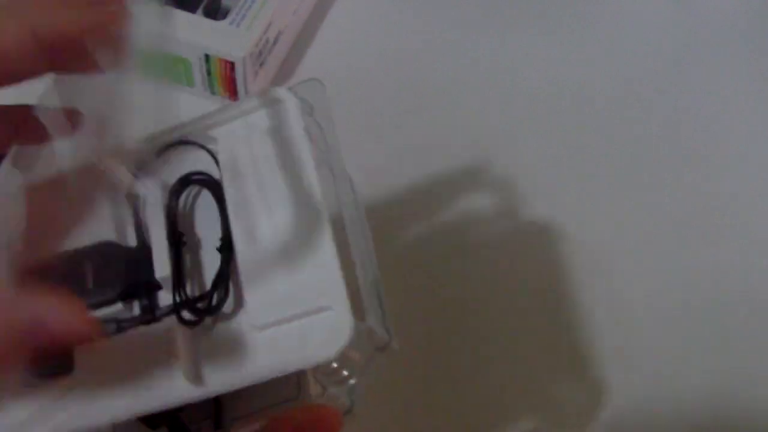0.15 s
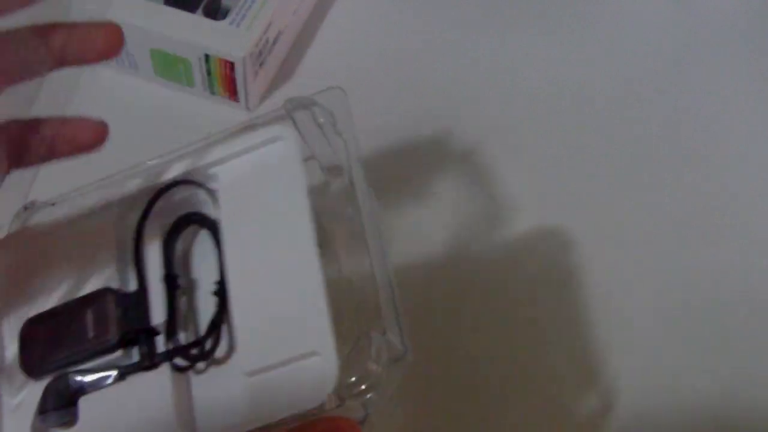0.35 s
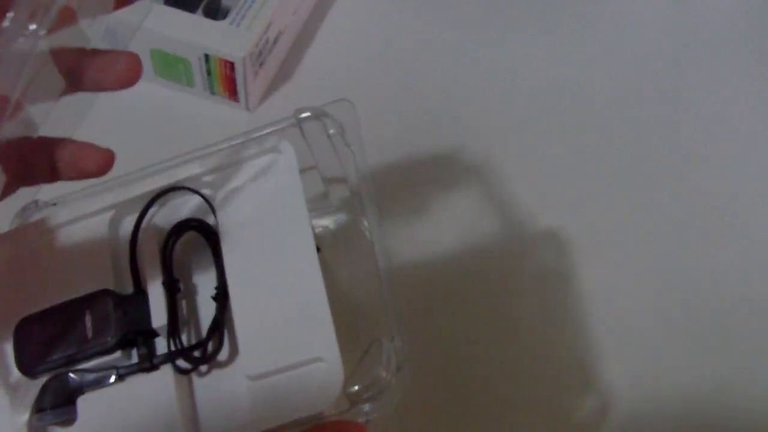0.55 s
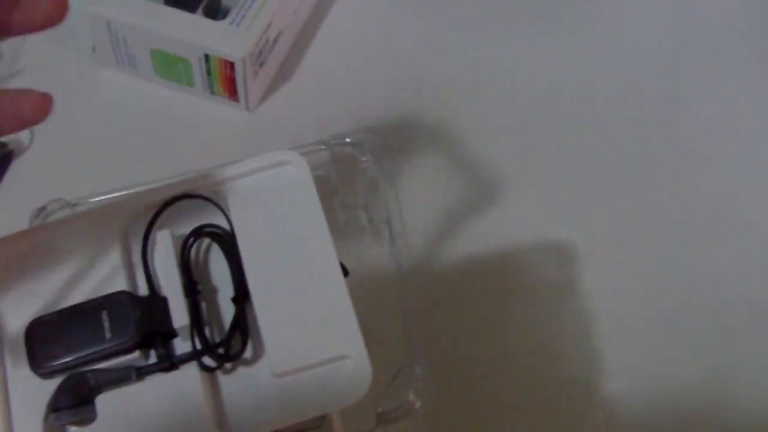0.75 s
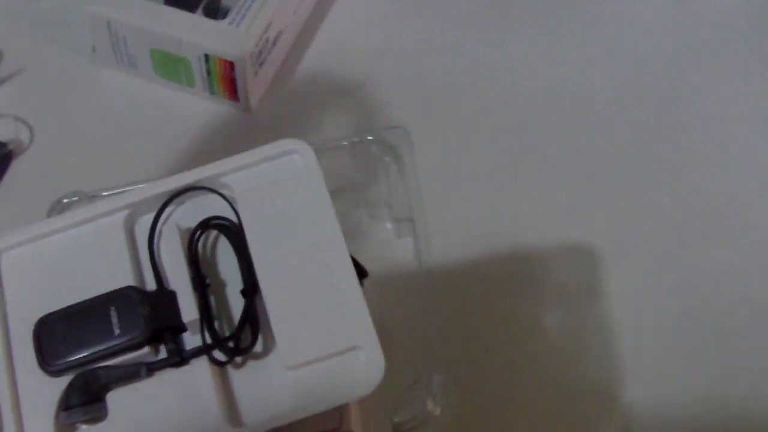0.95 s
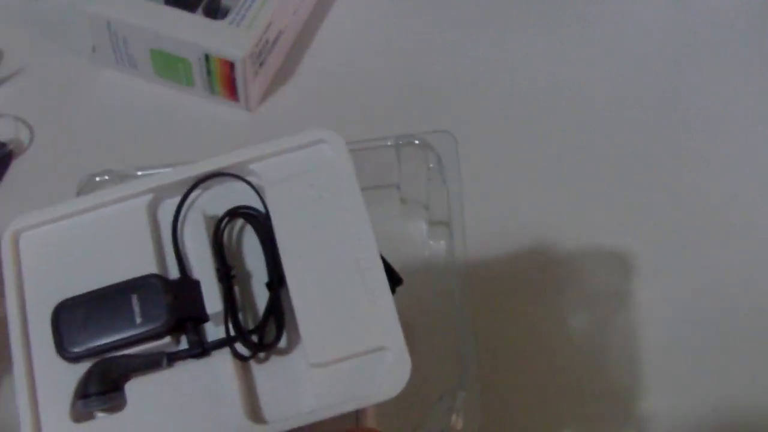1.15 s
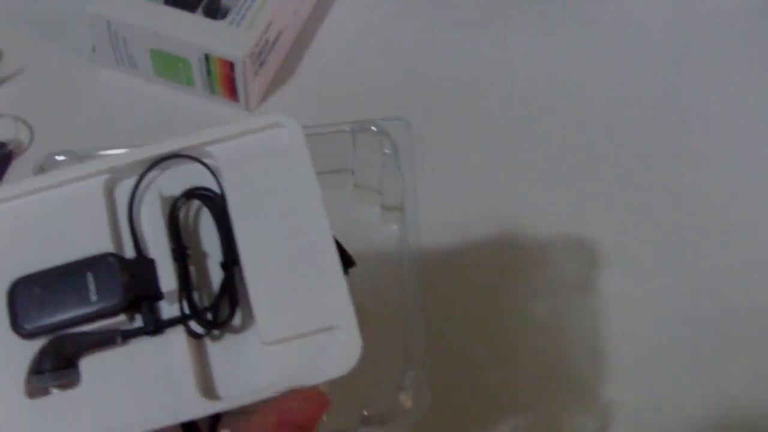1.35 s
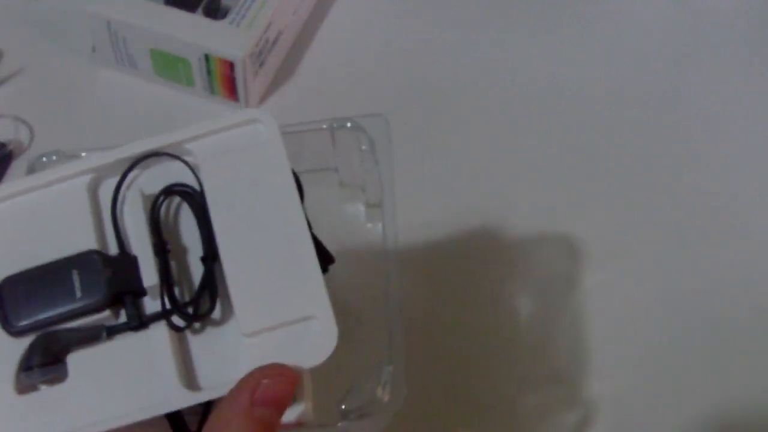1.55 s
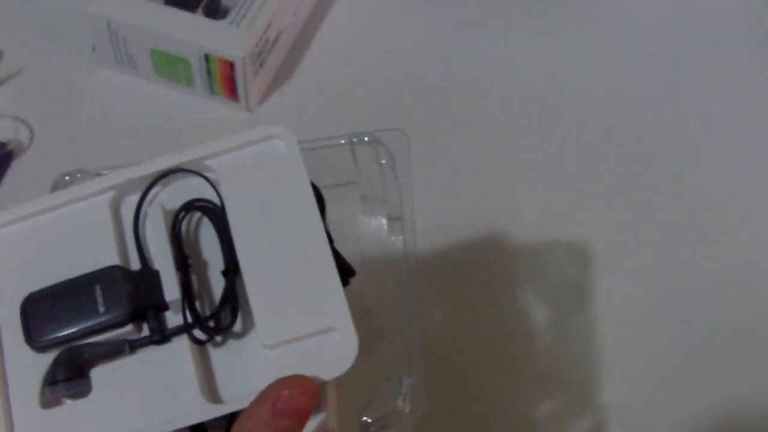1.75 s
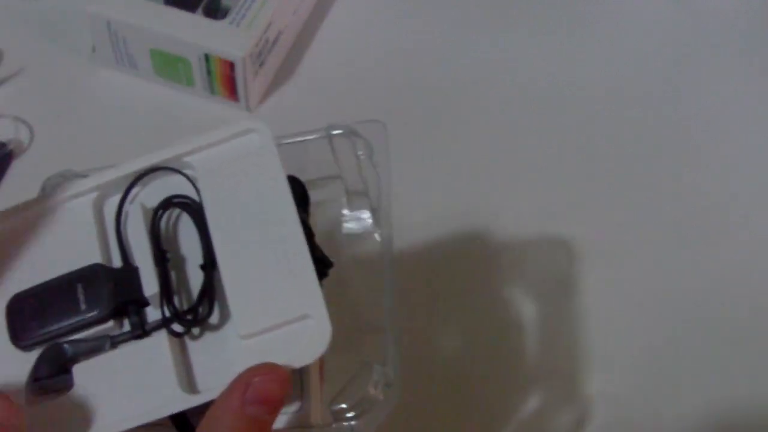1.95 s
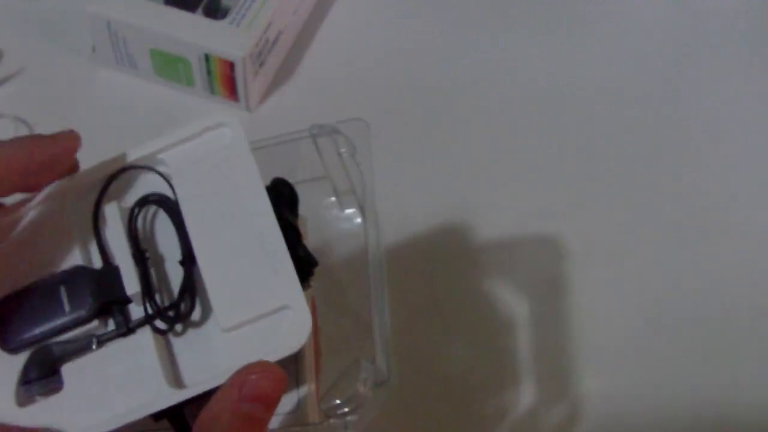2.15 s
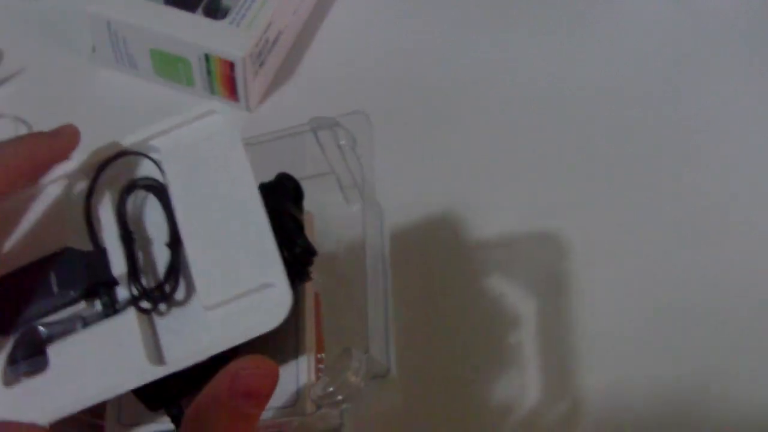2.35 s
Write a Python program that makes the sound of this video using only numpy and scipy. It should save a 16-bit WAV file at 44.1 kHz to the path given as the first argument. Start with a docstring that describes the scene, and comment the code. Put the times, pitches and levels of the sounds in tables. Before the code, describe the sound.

Stiff thin plastic buckles in short dry clicks, its catch bursts open with a sharp clatter, the tray slides out quietly with light creaks and ticks, then more crackles; close, slightly thin sound, small room, faint steady hiss.

```python
"""The walls of a clear plastic clamshell pack buckle in short clicks as it is pried open in a small room,
and its catch lets go with a loud rattling snap: each is a brief slip that excites damped modes.
The inner tray slides out with a hiss of dense friction grains and a faint squeak, the shell creaks
in the hands as small slips ring in a moving hollow, and coarser grains scuff its walls.
Feedback delays give the echo of the room, and filtered noise gives its steady tone."""
import sys
import numpy as np
from scipy import signal
from scipy.fft import rfft, irfft
from scipy.io import wavfile

SR = 44100
rng = np.random.default_rng(int(sys.argv[2]) if len(sys.argv) > 2 else 0)


def unload_audio(sound):
    """Save the sound as a 16-bit wav file, at the path given as the first command line argument."""
    columns = np.transpose(np.atleast_2d(sound))
    # keep every value between -1 and 1, then stretch to whole-number steps
    steps = np.round(np.clip(columns, -1, 1) * 32767)
    wavfile.write(sys.argv[1], SR, steps.astype(np.int16))


def natural_amplitude(level_db):
    """Convert a level in decibels to a linear amplitude factor, elementwise."""
    exponent = np.asarray(level_db, float) / 20
    return 10 ** exponent


N = 105840

# Spectrum of the room tone: frequency_hz, relative_level_db
ROOM_TONE_SPECTRUM = [(30, -22), (161, -25.5), (392, -3.5), (1180, -3), (1610, -3.5), (1990, -7.5),
                      (15800, -25.5)]
# Modes of the plastic shell: frequency_hz, relative_level_db, t60_s
SHELL_MODES = [(922, -13.5, 0.04), (1188, 5.5, 0.0075), (1707, 1.5, 0.0051), (2248, -2, 0.008),
               (2700, 4, 0.0051), (3213, 4, 0.003), (4130, -10.5, 0.0042), (5120, -9.5, 0.008)]
# Fingers and edges scuff the shell: start_s, rise_s, hold_s, fall_s, level_db, treble_to_body_db
SCUFFS = [(0.062, 0.0022, 0.023, 0.055, -46, -26), (0.121, 0.004, 0.03, 0.028, -46, -27),
          (0.194, 0.0018, 0.011, 0.027, -39.5, -32), (0.226, 0.0035, 0.01, 0.009, -39, -28),
          (0.262, 0.0039, 0.013, 0.16, -37.5, -7), (0.458, 0.019, 0.027, 0.0026, -56.5, -45),
          (0.549, 0.016, 0.033, 0.026, -48, -10), (.615, 0.005, 0.018, 0.017, -51, -32),
          (1.373, 0.0075, 0.022, 0.24, -64.5, 10.5), (2.037, 0.0072, 0.011, 0.015, -55, -22),
          (2.084, 0.035, 0.028, 0.038, -48.5, -4), (2.17, 0.017, 0.018, 0.02, -45, 0),
          (2.283, 0.0038, 0.036, 0.061, -46, -18), (2.334, 0.015, 0.038, 0.019, -54, 5.5)]
# Course of the creaking under the fingers: time_s, level_db
CREAK_LEVEL = [(0, -64), (.62, -64), (.8, -72), (.84, -61.5), (1.05, -59), (1.15, -58.5), (1.3, -64),
               (1.335, -58.5), (1.4, -52), (1.47, -53), (1.52, -48.5), (1.6, -57.5), (1.7, -56),
               (1.78, -63), (1.9, -63), (2.0, -62.5)]
# Spectrum of the creaking body at large: frequency_hz, relative_level_db
CREAK_BODY_SPECTRUM = [(60, -47), (100, -26), (270, -9), (480, -0.5), (920, -1), (1380, -3), (3000, -6.5),
                       (12000, -34.5)]
# Hollow under the grip: time_s, centre_hz, level_to_body_db
GRIP_HOLLOW = [(.62, 950, -6), (.84, 1300, -5), (.95, 700, -8), (1.3, 560, -8), (1.55, 650, -8),
               (1.63, 1220, 1), (1.72, 1290, 2), (2.04, 1200, 1)]
# Strokes of the tray sliding out: start_s, rise_s, hold_s, fall_s, level_db
SLIDES = [(.835, .13, .18, .03, -59), (1.387, .003, .025, .2, -53), (1.508, .004, .02, .28, -60),
          (1.66, .12, .13, .09, -63)]
# Spectrum of the sliding hiss: frequency_hz, relative_level_db
HISS_SPECTRUM = [(1500, -15.5), (3000, -3), (4600, -2.5), (5700, -7), (6700, 0.5), (7500, -2.5),
                 (8300, -7.5), (10200, -4.5), (13300, -16.5), (15500, -28)]
# Buckling clicks: start_s, body_peak_db, pitch_hz, relative_treble_db, slip_decay_s
CLICKS = [(.027, -29, 940, -8.5, 0.002), (.058, -29.5, 1130, -13.5, 0.0011), (.086, -24, 1024, -27, 0.003),
          (.126, -26.5, 1310, -15, 0.0035), (.142, -28, 1050, -15, 0.0011), (.182, -38, 1480, -1, 0.002),
          (.195, -22.5, 1270, -1.5, 0.0034), (.225, -23, 2300, -8, .0015), (.378, -36, 1390, -27, 0.0023),
          (.385, -40, 5200, -28, 0.0011), (.461, -39, 1160, -47, 0.0038),
          (.498, -39.5, 2700, -15.5, 0.00064), (.682, -45.5, 946, -27.5, .006),
          (.953, -39, 1080, -13.5, 0.0017), (1.074, -47, 490, -28, 0.00082),
          (1.138, -42.5, 2700, -22, 0.0037), (1.332, -40, 533, -2, 0.0027),
          (1.369, -34.5, 2920, -14.5, 0.0014), (1.388, -34.5, 600, 6.5, 0.0022),
          (1.392, -36, 3850, 2.5, 0.0068), (1.482, -22, 1740, -24, 0.00023),
          (1.5085, -29, 600, -11, 0.0037), (2.005, -41, 5000, -17, 0.0027),
          (2.016, -35, 1170, -20.5, 0.0042), (2.066, -38, 890, -43.5, 0.0026),
          (2.089, -41, 1220, -44, 0.0012), (2.107, -31, 1160, -29.5, 0.0027),
          (2.141, -30.5, 1280, -26.5, 0.0019), (2.187, -31.5, 1040, -6, 0.0097),
          (2.246, -25, 1360, -32, 0.004), (2.256, -27.5, 1130, -14.5, 0.0026),
          (2.271, -29, 4790, -25.5, 0.0018), (2.274, -26.5, 2800, -10, 0.0033),
          (2.287, -26, 974, -23, 0.005), (2.33, -34, 1060, -38, 0.003)]
# The catch lets go and rattles out: start_s, body_peak_db, relative_treble_db, slip_decay_s
SNAP = [(.2475, -5, -7.5, 0.004), (.2505, -7, -8, 0.0032), (0.2533, -3.5, -13, 0.0047),
        (.257, -15.5, -14.5, 0.0066), (.269, -12, -21, 0.0025), (.287, -25.5, -11, 0.0051),
        (.304, -26.5, -4, 0.0044), (.32, -33.5, -21, 0.0036), (.343, -30.5, -9, 0.0026),
        (.351, -32, -14.5, 0.0018)]


def rms_one(x):
    """Normalisation: divides a signal by its root mean square."""
    return x / np.sqrt(np.mean(x ** 2) + 1e-20)


def in_time(rows):
    """Linear interpolation: draws the columns of a timed table out to every sample."""
    times_s, *columns = np.transpose(rows)
    return [np.interp(np.arange(N) / SR, times_s, column) for column in columns]


def coloured(white, spectrum):
    """Spectral shaping: weights a white signal by a curve over log frequency, to rms 1."""
    hz, db = np.transpose(spectrum)
    bins_hz = np.maximum(np.fft.rfftfreq(N, 1 / SR), 1)
    gain = natural_amplitude(np.interp(np.log(bins_hz), np.log(hz), db))
    return rms_one(irfft(rfft(white) * gain, N))


def grains(per_s, spread_db):
    """Stick-slip as a random point process: sparse impulses of uneven size and sign."""
    sizes = natural_amplitude(spread_db * np.minimum(rng.exponential(1, N), 5)) * rng.choice([-1, 1], N)
    return sizes * (rng.random(N) < per_s / SR)


def stroke(start_s, rise_s, hold_s, fall_s, level_db):
    """Envelope linear in decibels: a stroke swells, holds, fades and dies away."""
    fade_db = 30.5
    times_s = np.cumsum([start_s, rise_s, hold_s, fall_s, 2 * fall_s])
    levels_db = level_db - fade_db * np.array([1, 0, 0, 1, 3])
    gain = np.zeros(N)
    i = np.arange(int(start_s * SR), min(int(times_s[-1] * SR), N))
    gain[i] = natural_amplitude(np.interp(i / SR, times_s, levels_db))
    return gain


def filtered(x, order, hz, kind):
    """Linear filtering: a Butterworth high-pass or low-pass."""
    return signal.sosfilt(signal.butter(order, hz, kind, fs=SR, output="sos"), x)


def ring(force, hz, t60_s):
    """Damped resonance: a unit impulse sets a decaying sine of height 1 ringing."""
    radius = natural_amplitude(-60 / (t60_s * SR))
    angle = 2 * np.pi * hz / SR
    poles = [1, -2 * radius * np.cos(angle), radius * radius]
    return signal.lfilter([0, np.sin(angle)], poles, force + 1e-18)


def shell(force, strengths_db, treble_db):
    """Modal superposition: one force drives every mode, and a soft contact leaves high ones weak."""
    dull_from_hz, usual_treble_db = 2000, -13
    out = 0
    for (hz, mode_db, t60_s), strength_db in zip(SHELL_MODES, strengths_db):
        contact_db = min(treble_db - usual_treble_db, 3.0) if hz > dull_from_hz else 0
        out = out + natural_amplitude(mode_db + strength_db + contact_db) * ring(force, hz, t60_s)
    return out


def bright(slip):
    """Direct radiation: a slip sounds in a band of treble without the help of the modes."""
    return filtered(filtered(slip, 2, 1980, "high"), 2, 5000, "low")


def room_tone():
    """Stationary noise: a steady spectrum shaped from white noise."""
    level_db = -64.5
    return natural_amplitude(level_db) * coloured(rng.standard_normal(N), ROOM_TONE_SPECTRUM)


def room(x):
    """Reverberation by recirculation: ten feedback delays grow duller on every round."""
    t60_s, wall_cut_hz = 0.31, 7100  # decay at low frequency; wall low-pass
    out = np.zeros(N)
    dull = np.exp(-2 * np.pi * wall_cut_hz / SR)
    lags = (rng.uniform(0.0078, 0.028, 10) * SR).astype(int)
    for k, lag in enumerate(lags):
        loop, state = x.copy(), [0.]
        gain = natural_amplitude(-60 * lag / SR / t60_s)
        for i in range(lag, N, lag):
            back, state = signal.lfilter([gain * (1 - dull)], [1, -dull], loop[i - lag:i], zi=state)
            loop[i:i + lag] += back[:N - i]
        out += (loop - x) * (-1) ** k
    return out


def scuffs():
    """Friction excitation: coarse grains rattle the shell, low modes first, and rasp in the treble."""
    grit = grains(7000, 3)
    body = shell(grit, np.zeros(len(SHELL_MODES)), -22.5)
    body = rms_one(filtered(body, 2, 600, "high"))  # thin walls radiate little bass
    rasp_ring = rms_one(ring(grit, 2600, 0.014) + ring(grit, 5300, 0.0036))
    rasp = rms_one(bright(grit) + natural_amplitude(-9) * rasp_ring)
    return sum(stroke(*shape) * (body + natural_amplitude(treble_db) * rasp) for *shape, treble_db in SCUFFS)


def grip_hollow(slips, centre_hz):
    """Moving resonance: two equal resonators in cascade follow the hollow under the grip."""
    width_hz, step = 240, 512  # width of each resonator; samples between retunings
    radius = np.exp(-np.pi * width_hz / SR)
    out, state = np.zeros(N), np.zeros((2, 2))
    for i in range(0, N, step):
        middle = -2 * radius * np.cos(2 * np.pi * centre_hz[i] / SR)
        resonators = [[0.99, 0, -1.052, 1, middle, radius * radius]] * 2
        out[i:i + step], state = signal.sosfilt(resonators, slips[i:i + step], zi=state)
    return rms_one(out)


def squeak(slips):
    """Sustained resonance: small slips keep one lightly damped mode sounding as the tray rubs."""
    swell = stroke(start_s=1.65, rise_s=.04, hold_s=.085, fall_s=.04, level_db=-59)
    return swell * rms_one(ring(slips, hz=1290, t60_s=.07))


def creaking():
    """Stick-slip: uneven slips ring in a moving hollow; finer ones sound in the body at large."""
    level_db, = in_time(CREAK_LEVEL)
    centre_hz, hollow_db = in_time(GRIP_HOLLOW)
    slips = grains(500, 1.1)
    hollow = grip_hollow(slips, centre_hz)
    body = coloured(grains(6000, 2.5), CREAK_BODY_SPECTRUM)
    share = natural_amplitude(hollow_db)
    mix = (share * hollow + body) / np.sqrt(1 + share ** 2)
    return natural_amplitude(level_db) * mix + squeak(slips)


def sliding():
    """Sliding friction: dense equal grains, coloured by the tray, merge into a hiss."""
    hiss = coloured(grains(12000, 0), HISS_SPECTRUM)
    return sum(stroke(*row) for row in SLIDES) * hiss


def thud():
    """Impulse response: the snap pushes the whole pack, which answers with one low mode."""
    push = np.zeros(N)
    push[int(SNAP[2][0] * SR)] = natural_amplitude(-35.5)
    return ring(push, hz=293, t60_s=0.037)


def slip_force(t, decay_s):
    """Transient excitation: an impulse and a burst of noise that builds fast and dies exponentially."""
    rise_share = .2  # time constant of the build-up as a share of the decay
    slip = rng.standard_normal(len(t)) * np.exp(-t / decay_s)
    slip *= 1 - np.exp(-t / (rise_share * decay_s))
    slip[0] += 1
    return slip


def buckled_body(force, hz, treble_db):
    """Modal response: the buckle rings at its own pitch and shakes the shell's modes; peak 1."""
    ring_db, shell_db, scatter_db = -4.5, -7, 2.5
    t60_s = max(.028 * (1000 / hz) ** 2, .011)  # falls with the square of the pitch
    strengths_db = shell_db + scatter_db * rng.standard_normal(len(SHELL_MODES))
    body = natural_amplitude(ring_db) * ring(force, hz, t60_s) + shell(force, strengths_db, treble_db)
    body = filtered(body, 2, min(0.88 * hz, 1200), "high")  # thin walls radiate little bass
    return body / np.abs(body).max()


def buckles():
    """Snap-through buckling: each click or snap is a dying slip with a modal body and a treble crack."""
    snap_ring_hz, crack_db = 2300, 5.5  # crack_db is added to each blow's treble_db
    rows = list(CLICKS)
    rows += [(s, db, snap_ring_hz, treble_db, decay_s) for s, db, treble_db, decay_s in SNAP]
    out, t = np.zeros(N + SR), np.arange(2000) / SR
    for start_s, peak_db, hz, treble_db, decay_s in rows:
        slip = slip_force(t, decay_s)
        force = slip / np.sqrt(np.sum(slip ** 2))  # unit energy
        body = buckled_body(force, hz, treble_db)
        crack = natural_amplitude(crack_db + treble_db) * bright(slip)
        i = int(start_s * SR)
        out[i:i + len(t)] += natural_amplitude(peak_db) * (body + crack)
    return out[:N] + thud()


def scene():
    """Superposition: the pack, its echo in the room and the room tone add linearly."""
    echo_db = -22
    pack = scuffs() + creaking() + sliding() + buckles()
    return (pack + natural_amplitude(echo_db) * room(pack) + room_tone())[None]


def low_pass(x):
    """Removes everything above the highest recorded frequency."""
    return signal.sosfilt(signal.butter(12, 16510, fs=SR, output="sos"), x)


def record(dry):
    """Transducer response: a small microphone has weak bass, a narrow treble dip and a steep top."""
    notch_hz, notch_width_hz = 7820, 190
    x = filtered(dry, 2, 151, "high")
    # the top is 30 dB down from 15600 Hz upward
    x = signal.sosfilt(signal.cheby2(8, 30, 15600, fs=SR, output="sos"), x)
    x = signal.lfilter(*signal.iirnotch(notch_hz, notch_hz / notch_width_hz, fs=SR), x)
    return low_pass(x)


dry = scene()
out = record(dry)
unload_audio(out)
```